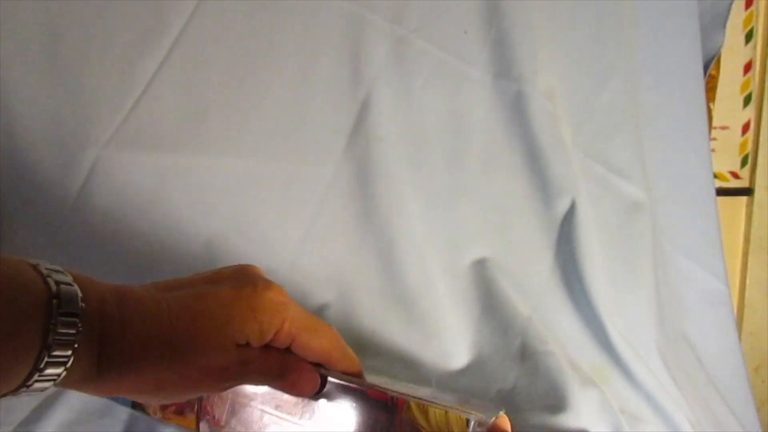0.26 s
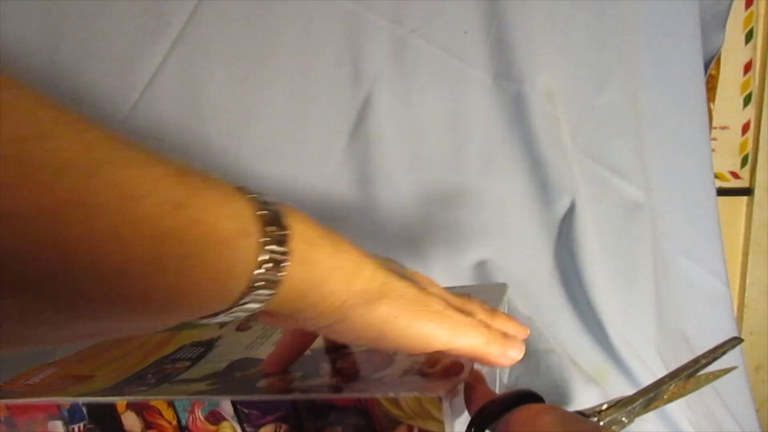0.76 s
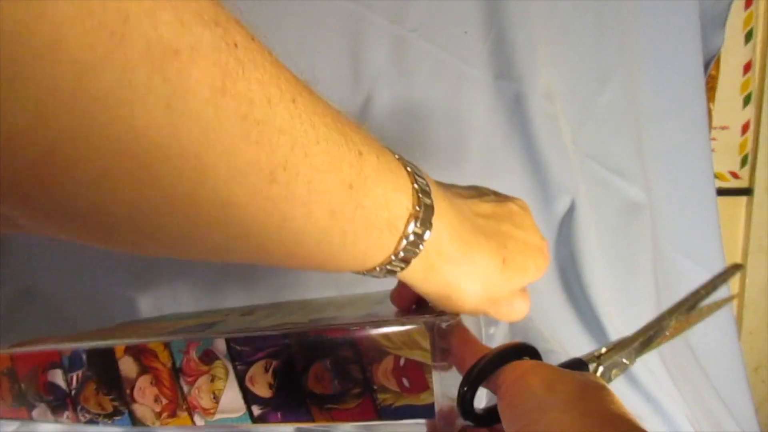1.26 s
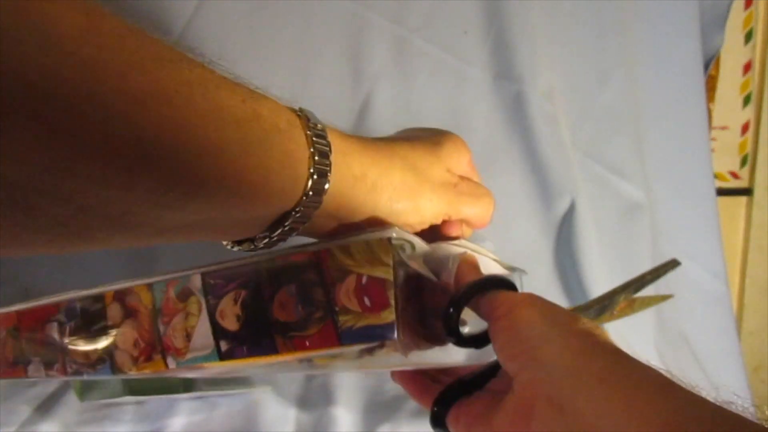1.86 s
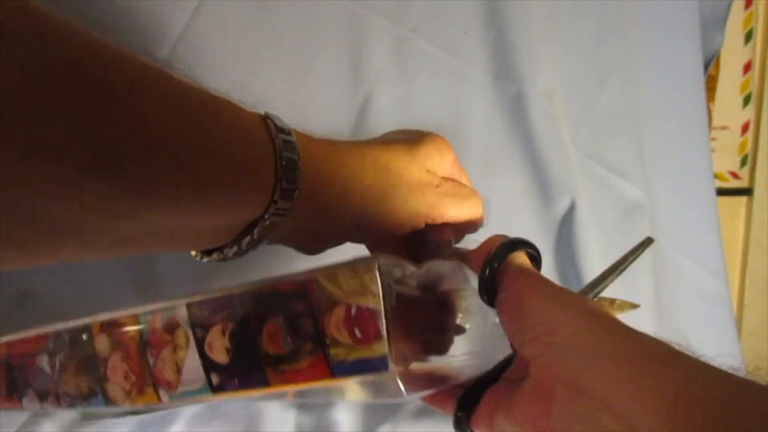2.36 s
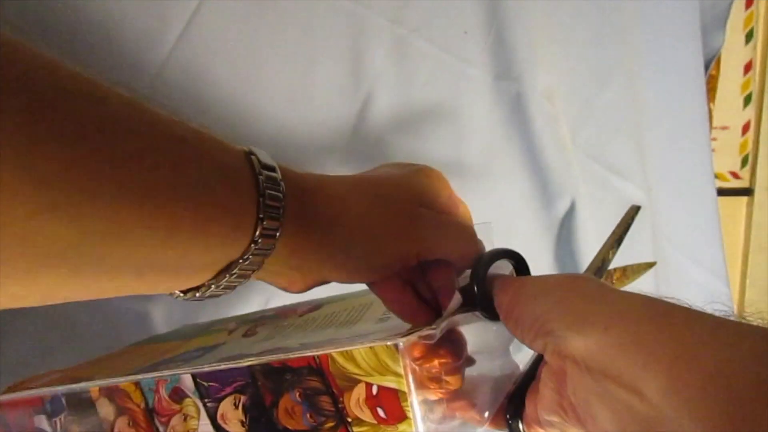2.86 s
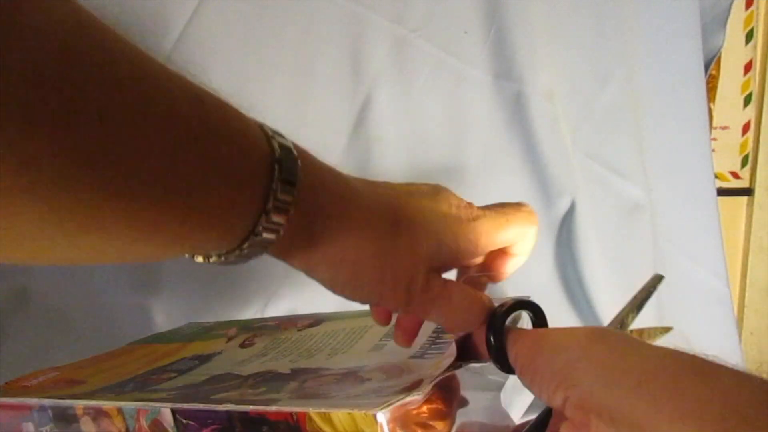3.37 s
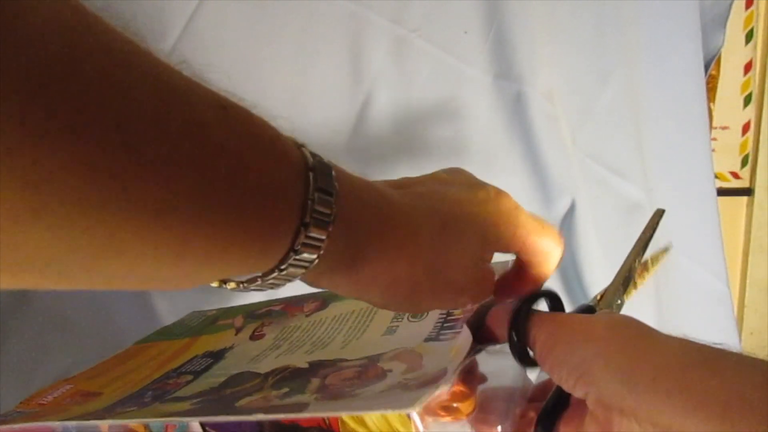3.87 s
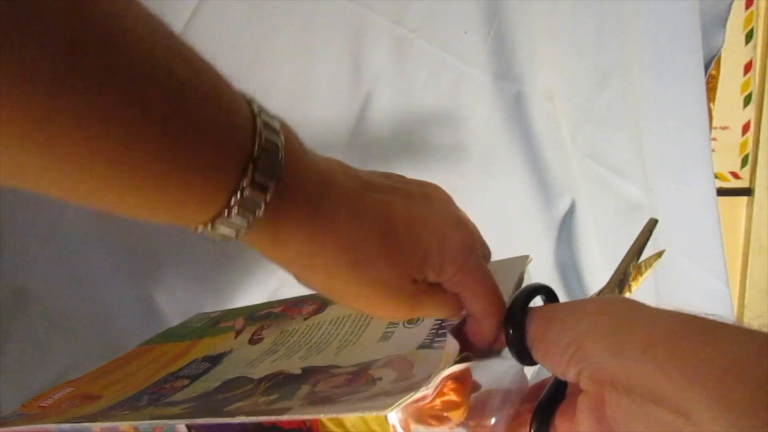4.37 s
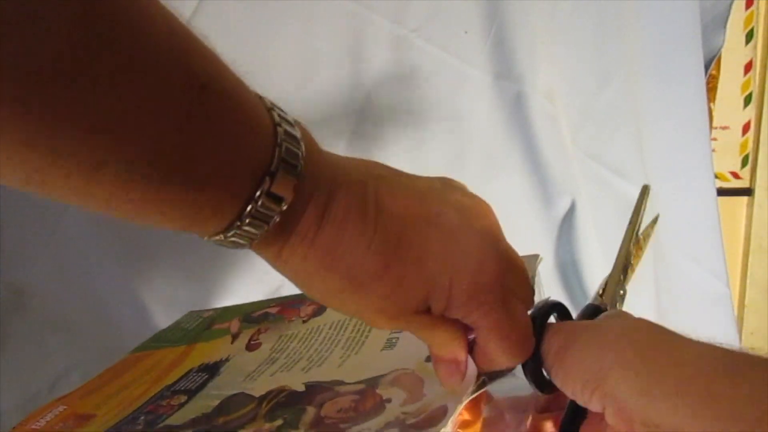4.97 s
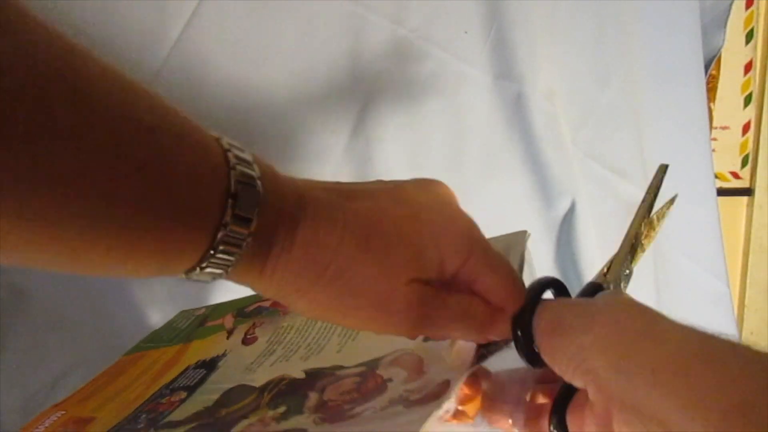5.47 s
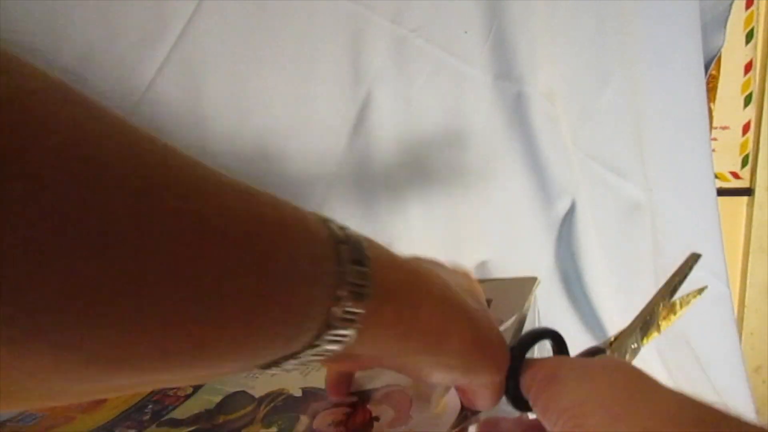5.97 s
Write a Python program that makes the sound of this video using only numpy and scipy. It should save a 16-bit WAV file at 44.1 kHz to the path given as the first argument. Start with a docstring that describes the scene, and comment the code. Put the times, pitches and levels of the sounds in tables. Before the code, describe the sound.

A thin plastic sheet buckles in sharp, irregular cracks while the hollow card box beneath it thuds dully. Card and fingers scrape steadily at first, with cloth brushing softly. The loudest snaps, about a third of the way in, distort. Afterwards come quiet, sparse clicks and tiny runs of tearing glue, then a last burst of popping. Close microphone, small room with short dull echo.

```python
"""Prying open a box with a plastic window

Hands pry open a cardboard box with a stiff plastic window, close by in a furnished room.
The plastic buckles in sharp snaps of filtered noise; the hollow box thuds as a set of fading tones.
Fingers and card slide over cloth as uneven noise, small ticks come from creases and a glued flap,
and the scissors held in one hand chink once. The loudest snaps overload the input."""
import sys
import numpy as np
from scipy import signal
from scipy.fft import rfft, irfft, next_fast_len
from scipy.io import wavfile
from scipy.ndimage import map_coordinates

SR = 44100
rng = np.random.default_rng(int(sys.argv[2]) if len(sys.argv) > 2 else 0)


def pcm_store(signal):
    """Save signal as 16-bit PCM."""
    levels = np.round(np.clip(np.atleast_2d(signal), -1, 1) * 32767)
    wavfile.write(sys.argv[1], SR, levels.astype(np.int16).T)


N = 273861  # length in samples, about 6.2 s


def amp(db):
    """Turns decibels into a plain multiplier."""
    return 10 ** (np.asarray(db) / 20)


def unit(x):
    """Scales a sound to an average (RMS) level of 1."""
    return x / np.sqrt(np.mean(x ** 2) + 1e-20)


def along(points, hz):
    """Reads a curve of (Hz, value) points, with pitch on a log axis."""
    f, v = np.transpose(points)
    return np.interp(np.log(hz + 1), np.log(f + 1), v)


def wobble(rate):
    """A smooth random curve with this many random points a second."""
    points = rng.standard_normal(int(N * rate / SR) + 4)
    return map_coordinates(points, [np.arange(N) * rate / SR])


def filtered(x, response):
    """Multiplies the spectrum of x by a response, which may be complex."""
    size = next_fast_len(x.shape[-1] + 8192)  # spare room for the filter to ring out
    spectrum = rfft(x, size) * response(np.fft.rfftfreq(size, 1 / SR))
    return irfft(spectrum, size)[..., :x.shape[-1]]


def resonance(f, hz, width):
    """A band-pass that rings only after it is struck, with gain 1 at its centre."""
    return 1j * f * width / (hz * hz - f * f + 1j * f * width)


def add(track, s, sound):
    """Mixes a sound into the track at time s in seconds."""
    part = track[max(round(s * SR), 0):][:len(sound)]
    part += sound[:len(part)]


def held_random(most, count, hold, scale_db):
    """Random boosts in dB, each held for a few samples, turned into multipliers."""
    boost_db = scale_db * np.minimum(rng.exponential(1, count // hold + 1), most)
    return amp(boost_db).repeat(hold)[:count]


def rub(spectrum, lumps_db, grit_db):
    """Friction noise: uneven pressure on top of tiny slips of scattered size."""
    grit = held_random(4, N, 40, grit_db)
    noise = filtered(grit * rng.standard_normal(N), lambda f: amp(along(spectrum, f)))
    pressure = amp(lumps_db * wobble(35))
    return unit(noise * pressure)


# The hands at work, with levels that glide from row to row. Each row: time in seconds, box rumble in dB,
# card scrape in dB, cloth brush in dB, deep rumble of the table in dB.
HAND_ROWS = [(0.0, -43.5, -39, -55, -51), (0.12, -37, -44, -48, -49), (0.28, -41.5, -46, -57, -48.5),
             (0.66, -46, -50, -55.5, -49), (0.85, -43.5, -49, -49, -48), (1.0, -42.5, -47, -52.5, -46),
             (1.3, -40, -45.5, -54, -55), (1.52, -43, -49.5, -56, -50), (1.7, -44, -48, -52, -52),
             (1.9, -44, -54.5, -68, -59), (2.09, -69, -60, -76.5, -65), (2.3, -54, -70.5, -71, -64),
             (2.58, -53.5, -57, -75, -68), (2.78, -60, -65, -66.5, -70.5), (3.02, -61, -57.5, -73.5, -69),
             (3.11, -63, -79, -85, -70.5), (3.3, -64, -61.5, -77, -67.5), (3.43, -60, -61, -78, -61),
             (3.72, -60.5, -71.5, -84, -65), (3.87, -50.5, -60.5, -71.5, -63.5),
             (4.15, -61, -65, -74.5, -63.5), (4.45, -55, -63.5, -70, -62), (4.95, -53.5, -61.5, -72, -61.5),
             (5.12, -48.5, -58, -79, -65), (5.3, -45, -57.5, -65, -61), (5.65, -49.5, -54, -67.5, -60),
             (5.8, -51.5, -47.5, -61.5, -66), (6.06, -47.5, -57, -62, -59), (6.21, -52.5, -55.5, -67, -53)]


def hand_levels():
    """How strongly the hands work: one dB value per sample for each of the four noises."""
    s, *columns = np.transpose(HAND_ROWS)
    return [np.interp(np.arange(N) / SR, s, column) for column in columns]


# Tone of the room air. Each row: pitch in Hz, relative strength in dB per Hz.
AIR_TONE = [(25, -9.5), (150, -3), (350, 3.5), (700, -5), (1400, -18.5), (4600, -22), (6000, -29.5),
            (16000, -46.5)]
# Tone of the deep table rumble. Each row: pitch in Hz, relative strength in dB per Hz.
DEEP_TONE = [(15, -25), (30, -8.5), (58, 5.5), (90, 5.5), (140, -41)]


def background():
    """Steady room air over a slow deep rumble of the table."""
    air = amp(-65) * rub(AIR_TONE, lumps_db=0, grit_db=0)
    deep_db = hand_levels()[3]
    return air + amp(deep_db) * rub(DEEP_TONE, lumps_db=0, grit_db=0)


# How long the room rings. Each row: pitch in Hz, time to fade by 60 dB in seconds.
ROOM_FADE = [(200, 0.62), (1000, 0.34), (3000, 0.17), (8000, 0.14), (15000, 0.09)]


def room(x):
    """Echoes as a short dull tail of fading noise; every third of a second meets a new one."""
    out, size = np.zeros(N), SR // 3
    for start in range(0, N, size):
        hz, t, noise = signal.stft(rng.standard_normal(size), SR, nperseg=256)
        fading = noise * amp(-60 * t / along(ROOM_FADE, hz)[:, None])
        tail = signal.istft(fading, SR, nperseg=256)[1]
        echo = signal.fftconvolve(x[start:start + size], tail / np.linalg.norm(tail))
        add(out, start / SR + 0.012, amp(-21.5) * echo)  # 12 ms after the direct sound
    return out


# Tone of the humming box. Each row: pitch in Hz, relative strength in dB per Hz.
RUMBLE_TONE = [(90, -14.5), (160, -1.5), (300, -5.5), (450, -9), (800, -10), (1300, -15), (2500, -44.5)]
# Tone of the scraping card. Each row: pitch in Hz, relative strength in dB per Hz.
SCRAPE_TONE = [(600, -30.5), (1200, -3), (2100, -3.5), (3400, -5.5), (4700, -5), (6000, -9.5), (10000, -28)]
# Tone of the hissing cloth. Each row: pitch in Hz, relative strength in dB per Hz.
CLOTH_TONE = [(3000, -19), (6000, -4.5), (8000, -1), (11000, -2), (13000, -4.5), (15000, -22.5),
              (16500, -20)]


def handling():
    """Sliding card and skin: the box hums, the card scrapes, the cloth hisses."""
    rumble_db, scrape_db, brush_db, _ = hand_levels()
    rumble = amp(rumble_db) * rub(RUMBLE_TONE, lumps_db=3.5, grit_db=2.0)
    scrape = amp(scrape_db) * rub(SCRAPE_TONE, lumps_db=2.9, grit_db=2.5)
    brush = amp(brush_db) * rub(CLOTH_TONE, lumps_db=2.1, grit_db=2.5)
    return rumble + scrape + brush


# Resonances of the plastic window. Each row: pitch in Hz, width in Hz, relative strength in dB.
WINDOW_MODES = [(1780, 1100, 3), (3870, 930, -8.5), (4900, 1600, -6), (7430, 2700, -0.5)]


def sheet(f):
    """The plastic sheet favours a few broad bands."""
    return sum(amp(db) * resonance(f, hz, width) for hz, width, db in WINDOW_MODES)


def through_window(ticks, hz):
    """Ticks coloured by the plastic sheet around one pitch; the highest peak keeps its level."""
    coloured = filtered(ticks, lambda f: sheet(f) * resonance(f, hz, 1.6 * hz) ** 2)
    return coloured * ticks.max() / np.abs(coloured).max()


CRACKLE_PER_S = 90  # average ticks a second
CRACKLE_DB, CRACKLE_SPREAD_DB = 8.5, 4  # faintest tick over the scrape level, and scatter above that


def crackle():
    """Small creases give way at random while the card moves; most are faint, a few stand out."""
    when, size = rng.random((900, 2)).T
    times = np.cumsum(-np.log(1 - when)) / CRACKLE_PER_S
    at = np.round(times[times < (N - 1) / SR] * SR).astype(int)
    extra_db = -CRACKLE_SPREAD_DB * np.log(1 - .95 * size[:len(at)])
    scrape_db = hand_levels()[1]
    ticks = np.zeros(N)
    ticks[at] = amp(scrape_db[at] + CRACKLE_DB + extra_db)
    return through_window(ticks, hz=2820)


# A glued flap lets go in runs of small ticks. Each row: start in seconds, end in seconds,
# average ticks a second, middle tick level in dB before the window colours it.
PEEL_RUNS = [(3.055, 3.12, 92, -45), (3.18, 3.231, 90, -51.5), (3.299, 3.426, 70, -49),
             (3.776, 3.792, 170, -44), (4.302, 4.33, 120, -38), (4.62, 4.72, 72, -47),
             (5.01, 5.09, 88, -43), (5.1, 5.17, 60, -39), (5.185, 5.29, 104, -39)]


def peels():
    """Glue threads break one after another at a nearly even pace, each a tick through the window."""
    ticks = np.zeros(N)
    for start, end, rate, db in PEEL_RUNS:
        pace, strength = rng.standard_normal((40, 2)).T
        times = start + np.cumsum(1 + 0.18 * pace) / rate
        inside = times < end
        ticks[np.round(times[inside] * SR).astype(int)] = amp(db + 3.5 * strength[inside])
    return through_window(ticks, hz=5460)


# A fingertip squeaks on the window; the first row is instead a late ringing tone of the scissor blades, # near
# 5.1 kHz. Each row: loudest moment in seconds, length of the rise (and of the equal fall) in seconds, # level
# in dB, pitch in Hz.
SQUEAK_ROWS = [(.084, .05, -34.5, 5100), (0.296, .014, -38, 1950), (0.317, .011, -42, 2070),
               (.38, .012, -36, 2000), (0.394, .015, -35, 2040), (0.859, .011, -34, 1830),
               (0.874, .012, -33, 2050), (3.058, .026, -51, 2030), (4.49, .007, -20, 3900),
               (4.739, .012, -42.5, 2020)]
# Scuffs of a finger on the window and brush strokes on cloth (the long treble rows). Each row: loudest
# moment in seconds, length of the rise (and of the equal fall) in seconds, level in dB, middle pitch in Hz.
SCUFF_ROWS = [(0.195, 0.05, -30, 2380), (0.48, 0.29, -44, 9900), (0.73, 0.025, -47, 11000),
              (0.973, 0.3, -45.5, 9250), (1.376, 0.086, -32, 5000), (1.542, 0.021, -37, 1850),
              (1.667, 0.072, -46, 11000), (2.623, 0.018, -37.5, 3460), (3.353, 0.068, -51.5, 3200),
              (3.464, 0.011, -39.5, 3020), (3.785, 0.02, -41.5, 2390), (4.257, 0.025, -50, 2370),
              (4.611, 0.032, -51, 2380), (4.81, 0.025, -60, 9040), (5.3, 0.02, -55, 7000),
              (5.46, 0.048, -45.5, 3100), (5.806, 0.026, -37.5, 3960)]
SQUEAK_SPREAD, SCUFF_SPREAD = .2, 1.3  # resonance width as a share of the pitch


def scuffs_and_strokes():
    """Fingertip stick-slip, a late blade ring and cloth strokes: swells of noise, narrow in pitch for squeaks
    and the ring, else wide."""
    out = np.zeros(N)
    for rows, spread in ((SQUEAK_ROWS, SQUEAK_SPREAD), (SCUFF_ROWS, SCUFF_SPREAD)):
        for s, length, db, hz in rows:
            t = np.arange(-length, length, 1 / SR)
            swell = np.exp(-8 * (t / length) ** 2)
            noise = filtered(rng.standard_normal(SR), lambda f: resonance(f, hz, spread * hz) ** 2)
            add(out, s - length, amp(db) * swell * unit(noise)[:len(t)])
    return out


# Ringing tones of the scissor blades. Each row: pitch in Hz, relative level in dB,
# time to fade by 60 dB in seconds.
BLADE_MODES = [(3000, -23, .04), (7070, -1, 0.068), (9970, -1, 0.085), (11400, 0, .03), (12700, -4.5, .04)]
CHINK_S = .062  # when the blades touch, in seconds


def chink():
    """The blades touch and rattle for a moment: fading tones whose loudness jumps about."""
    out, t = np.zeros(N), np.arange(SR // 8) / SR
    ring = sum(amp(db - 60 * t / t60) * np.sin(2 * np.pi * hz * t) for hz, db, t60 in BLADE_MODES)
    rattle = amp(3 * rng.standard_normal(len(t) // 100 + 1)).repeat(100)[:len(t)]
    onset = 1 - np.exp(-t / 0.0066)
    add(out, CHINK_S, amp(-24.5) * ring * rattle * onset)
    return out


# Ringing tones of the hollow box. Each row: pitch in Hz, relative level in dB, time to fade by 60 dB
# in seconds before the hand damps it. Pitch, level and fade are varied for each blow.
BOX_MODES = [(163, -8.5, .3), (216.1, -1.5, 0.15), (308.4, -2, 0.13), (353.2, -7.5, 0.26),
             (393.4, -3, 0.13), (453.4, -5.5, 0.15), (579, -7, 0.15), (642, -12.5, 0.16), (767, 4.5, 0.097),
             (858, 1.5, 0.12), (909, 4.5, 0.025), (1170.5, -1.5, 0.08), (1370, -4.5, 0.14),
             (1549, 0.5, 0.053), (1830, -8, .04), (2150, 0.5, 0.068), (2780, -17.5, .025)]
# Thuds of the box. Each row: start in seconds, peak level in dB, struck pitch in Hz.
THUD_ROWS = [(0.005, -12, 291), (0.102, -10.5, 337), (0.18, -18, 415), (0.211, -16.5, 590),
             (0.337, -32, 347), (0.479, -28, 437), (0.549, -21.5, 287), (0.558, -14.5, 334),
             (0.579, -10, 342), (0.609, -15, 430), (0.795, -34, 340), (0.85, -29, 520), (0.946, -31.5, 327),
             (1.05, -21.5, 530), (1.083, -28, 503), (1.233, -6.5, 380), (1.32, -6, 500), (1.415, -26, 467),
             (1.477, -33.5, 261), (1.785, -0.5, 542), (1.813, -6.5, 790), (1.882, -20.5, 560),
             (2.001, -9, 646), (2.045, -20, 385), (2.231, -29, 550), (2.357, -16.5, 593), (2.464, -19, 560),
             (2.476, -27, 470), (2.622, -31, 545), (2.67, -19.5, 576), (2.764, -23.5, 805),
             (2.784, -29, 520), (2.874, -24.5, 614), (2.947, -35.5, 606), (3.357, -42, 334),
             (3.46, -32, 383), (3.698, -39, 340), (3.771, -38, 650), (3.832, -31.5, 560),
             (3.951, -30.5, 244), (4.006, -37.5, 280), (4.646, -36, 423), (4.67, -35, 217),
             (4.694, -33.5, 299), (5.025, -31, 270), (5.077, -41, 327), (5.182, -26.5, 320),
             (5.291, -23, 254), (5.344, -31.5, 457), (5.383, -27, 318), (5.457, -31.5, 497),
             (5.627, -11.5, 510), (5.67, -24.5, 377), (5.776, -29, 415), (5.821, -20, 440),
             (5.853, -19.5, 644), (5.87, -28.5, 490), (6.066, -37, 420)]
# Sharper blows land near the gripping hand and ring shorter.
FREE_BELOW_HZ, DAMPS_PER_OCTAVE = 488, 1.2


def thuds():
    """The card walls pop and the box knocks: modes near the struck pitch ring loudest, anew for every blow."""
    out, t = np.zeros(N), np.arange(SR // 4) / SR
    hz, mode_db, t60 = np.transpose(BOX_MODES)[..., None]
    for s, db, struck_hz in THUD_ROWS:
        freedom = .85 - DAMPS_PER_OCTAVE * max(np.log2(struck_hz / FREE_BELOW_HZ), 0)
        level_chance, pitch_chance = rng.standard_normal((2, len(BOX_MODES), 1))
        octaves = np.log2(hz / struck_hz)
        near_db = np.where(octaves > 0, -4500 / struck_hz * octaves, 10 * octaves)  # low blows are dull
        strength = amp(mode_db + near_db + 2.17 * level_chance)
        fade = amp(-60 * t / (t60 * np.clip(freedom, .2, 1)))
        fade = fade + 1.31 * amp(-60 * t / 0.033)  # the first swings are the widest
        tones = np.sin(2 * np.pi * hz * (1 + 0.034 * pitch_chance) * t)
        onset = 1 - np.exp(-t * struck_hz * 1.27)  # low blows start softly
        knock = (strength * fade * tones).sum(0) * onset
        add(out, s, amp(db) * knock / np.abs(knock).max())
    return out


# Plastic snaps. Each row: start in seconds, peak of the snap's body in dB, centre pitch in Hz,
# treble in dB against the body, settling crackle in dB against the body's peak.
SNAP_ROWS = [(0.0962, -12, 2560, -28, -9), (0.1647, -24, 2770, -10, -12), (0.1804, -9, 2480, -7.5, -19),
             (0.1897, -8.5, 2170, -20, -24), (0.2112, -3, 3300, -13.5, -14),
             (0.2159, -7.5, 1950, -20, -14.5), (0.5516, -23.5, 3570, 1.5, -12.5),
             (0.5849, -10.5, 2300, -0.5, -19), (0.6123, -18, 1720, -22, -15), (0.8458, -22, 3330, 0, -19),
             (0.8536, -18, 1870, -22, -30), (1.0561, -23.5, 2300, -8, -15), (1.0983, -31, 2090, -13, -16),
             (1.17, -22.5, 2260, -2.5, -12.5), (1.2338, -27, 1540, -22, -10),
             (1.321, -11.5, 1600, -24, -9.5), (1.4163, -3.5, 3000, -1.5, -20), (1.439, -18, 4260, -2, -15),
             (1.4779, -24, 3480, -16, -19), (1.5457, -11, 5130, -16, -19), (1.563, -24.5, 5230, -12, -13),
             (1.7286, -40, 4160, 13, -27), (1.7872, -11.5, 2030, -12, -37),
             (1.8071, -4.5, 3260, -38, -15.5), (1.8124, 1, 2940, -8.5, -36),
             (1.8293, -17.5, 2880, -22, -12), (1.8838, -9.5, 2200, -20, -20), (2.0025, 7, 3460, -12, -33.5),
             (2.0471, -16, 2880, -6, -22), (2.14, -33, 4700, -11, -25), (2.1981, -35, 4480, -15, -38),
             (2.234, -31.5, 1670, -26, -17), (2.2465, -41, 3660, -2, -26), (2.3129, -35, 3210, -6, -19),
             (2.3242, -30, 3250, -7, -24), (2.3583, -9, 2160, -22, -20.5), (2.4188, -7.5, 3870, 0.5, -26),
             (2.439, -14, 3790, 0, -20), (2.458, 5.5, 4700, -4.5, -30), (2.4648, -3, 2750, -17, -21),
             (2.4959, -26, 3630, -2, -16), (2.5681, -29.5, 5170, 6, -28), (2.6156, -25, 2900, -22, -14),
             (2.6712, 1, 4770, -10, -26), (2.68, 7, 3850, -14, -38), (2.7631, -18, 2770, -31, -21),
             (2.7864, -4.5, 2570, -9, -25.5), (2.827, -38, 5000, -5.5, -25), (2.8517, -34, 2300, -24, -22),
             (2.8763, 2.5, 3500, -7, -34), (2.9472, -21.5, 3220, -15, -22),
             (3.0381, -33, 2764, -12.5, -21.5), (3.4536, -22, 3610, -8.5, -21.5),
             (3.4634, -27.5, 2720, -22.5, -24), (3.698, -38.5, 2320, -29, -17), (3.7043, -44, 3600, 3, -23),
             (3.7445, -24.5, 3500, -5.5, -20.5), (3.755, -22.5, 2900, -4, -31),
             (3.7767, -25, 3650, -12, -36), (3.832, -21.5, 2300, -6, -26), (3.9124, -12.5, 4400, 1, -25),
             (3.9922, -34.5, 2880, -24.5, -19), (4.149, -26, 4050, -4.5, -24), (4.302, -24, 4160, -5, -29),
             (4.3395, -21.5, 5300, -5, -40), (4.3887, -34.5, 2100, -36, -24),
             (4.4459, -31.5, 2940, -5, -16), (4.489, -23, 3870, -1.5, -20),
             (4.6464, -32.5, 3750, -9, -16.5), (4.6752, -39, 4020, -12, -12),
             (4.8902, -34.5, 3880, -14, -23), (5.174, -37, 3130, -7, -3), (5.3465, -27.5, 2770, 0, -27),
             (5.6274, -3, 3000, -30, -28.5), (5.7006, -18.5, 3800, -6, -24), (5.721, -25.5, 2220, -11, -24),
             (5.778, -25, 2180, -5, -15), (5.8177, -9, 4100, -6.5, -19.5), (5.847, -21, 4000, -7, -28),
             (5.8519, -4, 3000, -1.5, -24), (5.8723, -29, 2390, -17, -25), (6.0473, -24, 2310, -8.5, -17),
             (6.1454, -37, 2310, -22, -19)]
FLIP_T60_S, DULL_S_PER_DB = .002, .0001  # fade time of a flip; each dB less treble makes it last longer


def snaps():
    """A crease flips over in about a millisecond; the sheet then crackles on while it settles."""
    out, t = np.zeros(N), np.arange(SR // 8) / SR
    for s, db, hz, treble_db, settle_db in SNAP_ROWS:
        flip, settle = rng.standard_normal((2, len(t)))
        settle = settle * held_random(3, len(t), 50, 3)  # uneven crackle
        flip_t60 = np.clip(FLIP_T60_S - DULL_S_PER_DB * treble_db, .0005, .03)
        flip = flip * amp(-60 * t / flip_t60) * (1 - np.exp(-t / 0.0005))
        both = np.array([flip, settle])
        body, dull = filtered(both, lambda f: (0.35 + sheet(f)) * resonance(f, hz, 1.157 * hz) ** 2)
        edge, bright = filtered(both, lambda f: resonance(f, 8610, 4800) ** 2)  # treble fizz

        snap = body / np.abs(body).max() + amp(treble_db) * edge / np.abs(edge).max()
        add(out, s, amp(db) * snap)
        dull = unit(dull) * amp(-60 * t / 0.074)
        bright = unit(bright) * amp(treble_db - 4.0 - 60 * t / 0.069)  # treble dies first
        add(out, s, amp(db + settle_db) * (dull + bright) * (1 - np.exp(-t / 0.0013)))
    return out


def scene():
    """Snaps, knocks, ticks, scuffs and strokes echo in the room; steady rubbing and air stay dry."""
    hits = snaps() + thuds() + scuffs_and_strokes() + chink() + peels() + crackle()
    return (hits + room(hits) + handling() + background())[None]


EDGE_HZ, TOP_HZ = 14950, 16350  # treble weakens above the first, is gone above the second


def record(dry):
    """The input squashes peaks just below full scale; the top of the treble is weak, then cut."""
    clipped = dry / (1 + np.abs(dry / .93) ** 8) ** (1 / 8)

    def fall(f, hz):
        """Goes from 0 to 1 over 300 Hz."""
        return np.clip((f - hz) / 300, 0, 1)

    return filtered(clipped, lambda f: amp(-22 * fall(f, EDGE_HZ)) * (1 - fall(f, TOP_HZ - 300)))


dry = scene()
out = record(dry)
pcm_store(out)
```